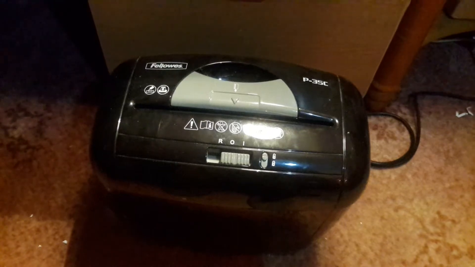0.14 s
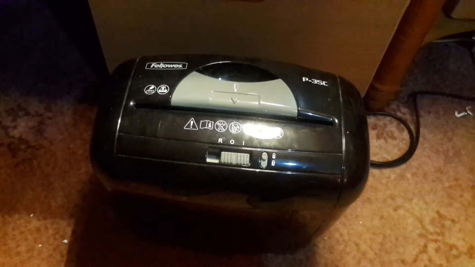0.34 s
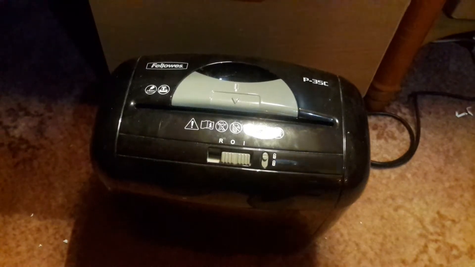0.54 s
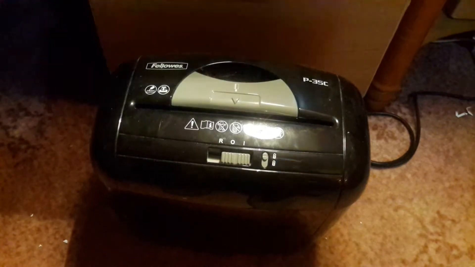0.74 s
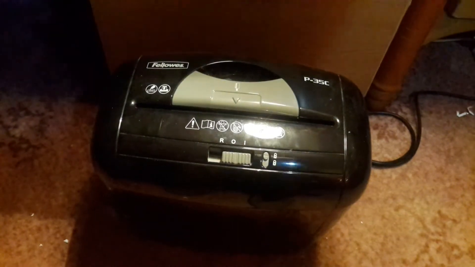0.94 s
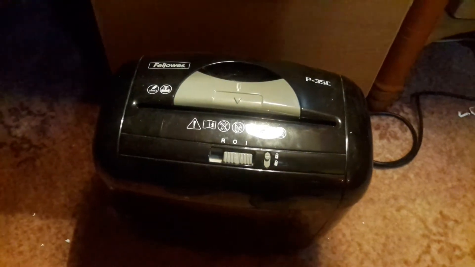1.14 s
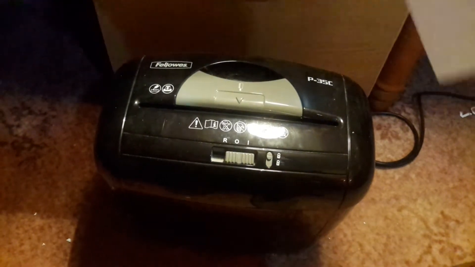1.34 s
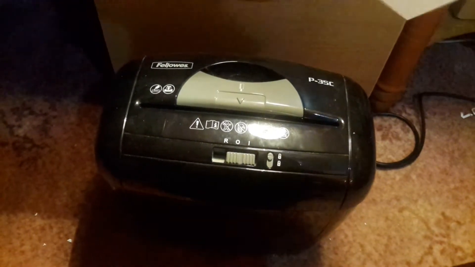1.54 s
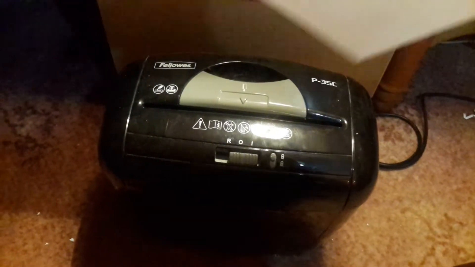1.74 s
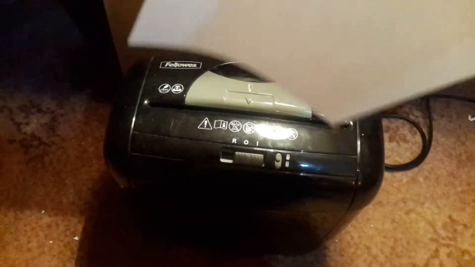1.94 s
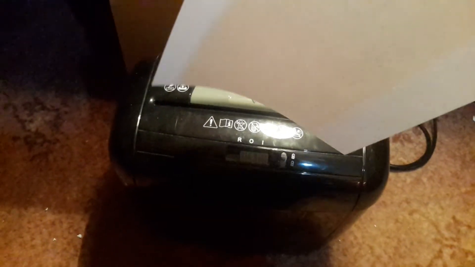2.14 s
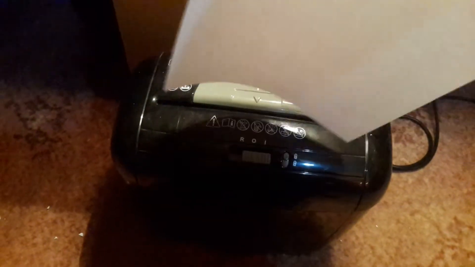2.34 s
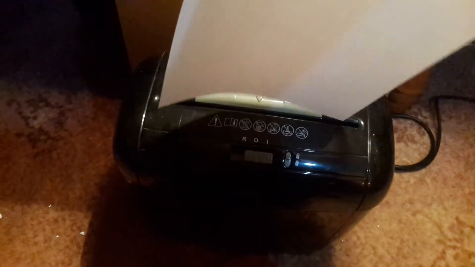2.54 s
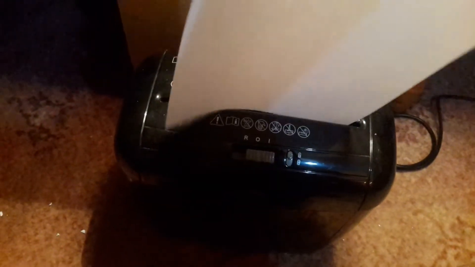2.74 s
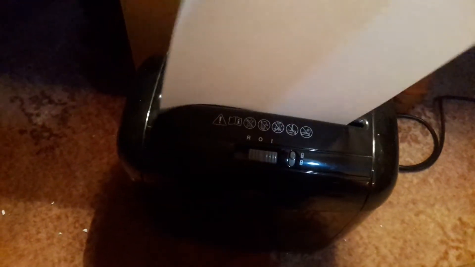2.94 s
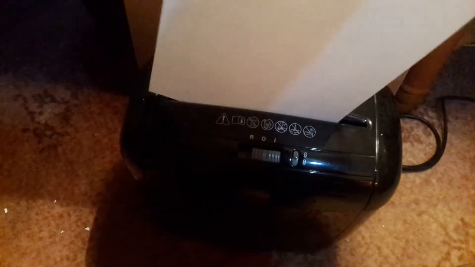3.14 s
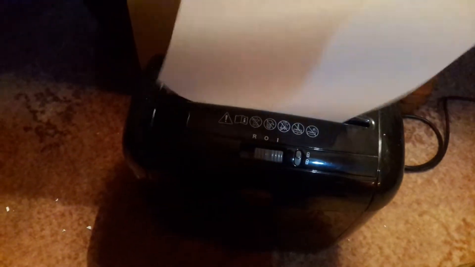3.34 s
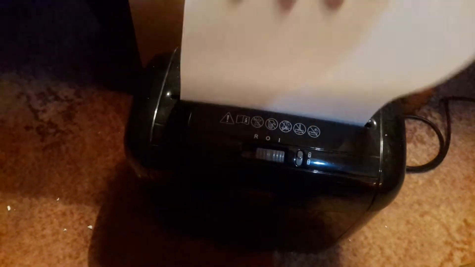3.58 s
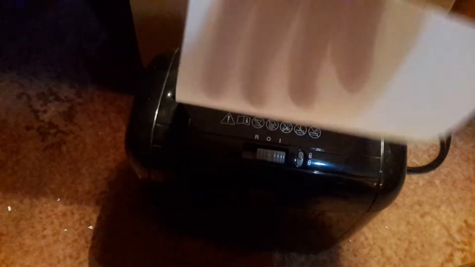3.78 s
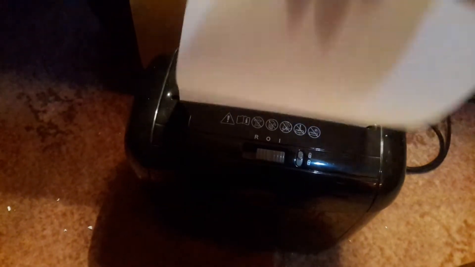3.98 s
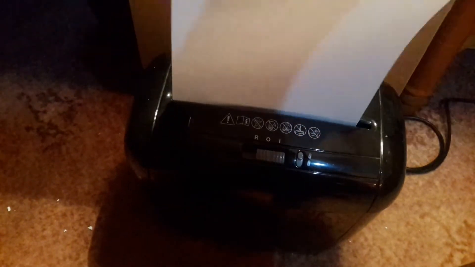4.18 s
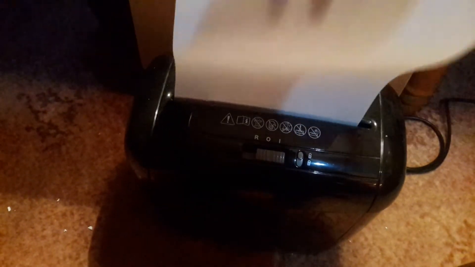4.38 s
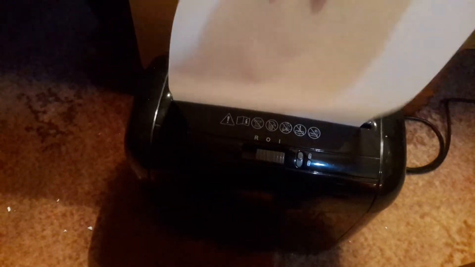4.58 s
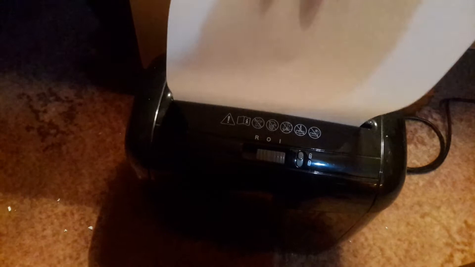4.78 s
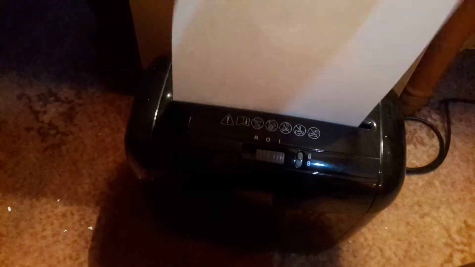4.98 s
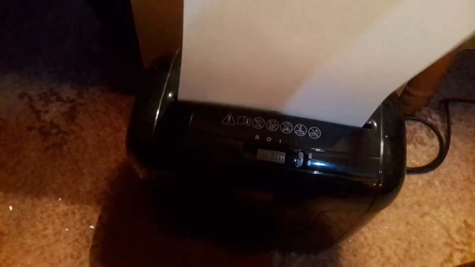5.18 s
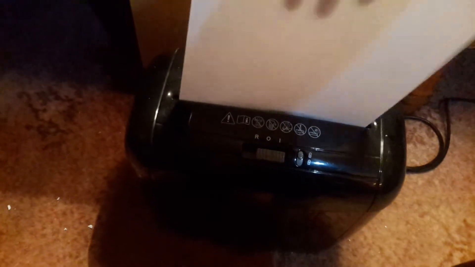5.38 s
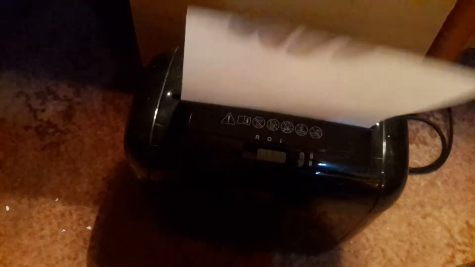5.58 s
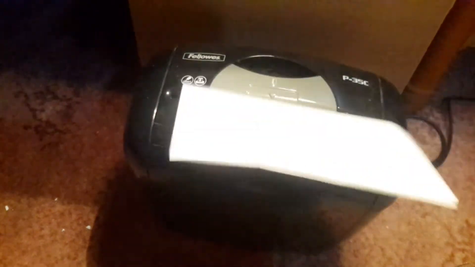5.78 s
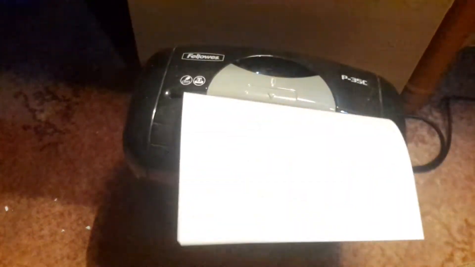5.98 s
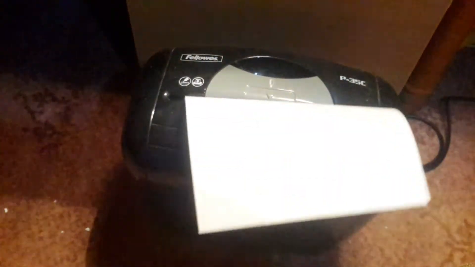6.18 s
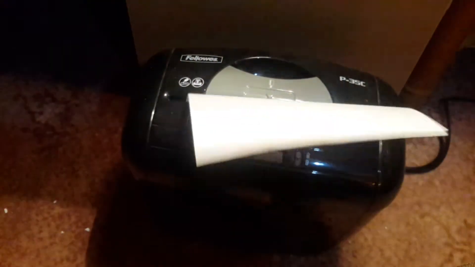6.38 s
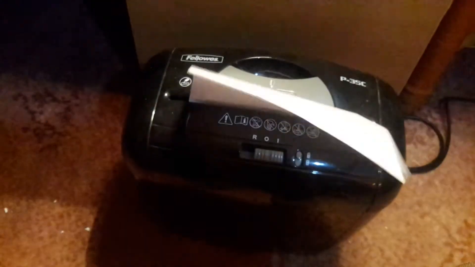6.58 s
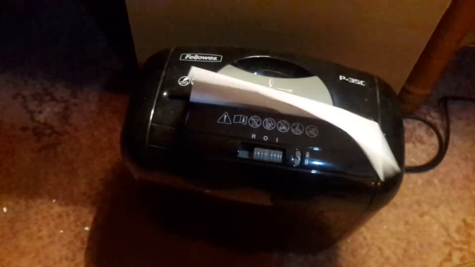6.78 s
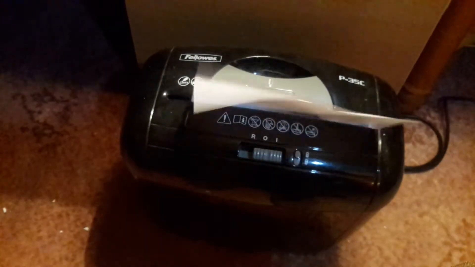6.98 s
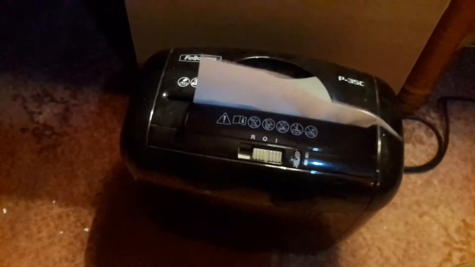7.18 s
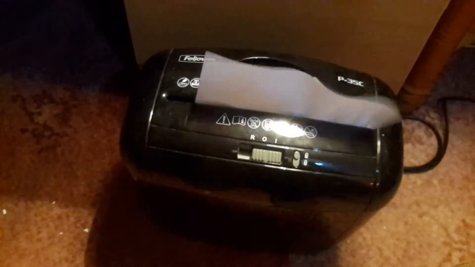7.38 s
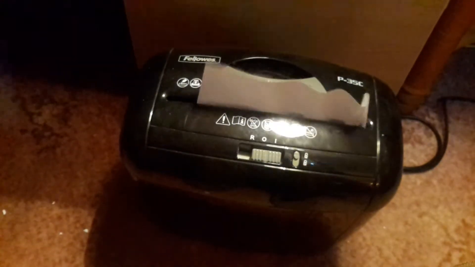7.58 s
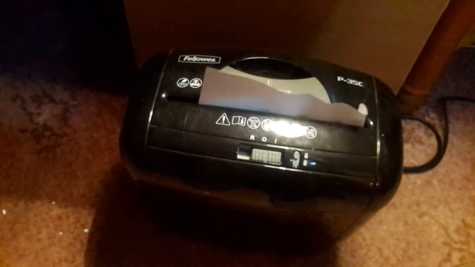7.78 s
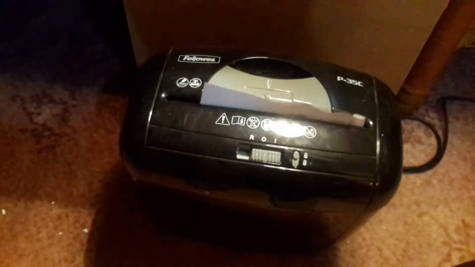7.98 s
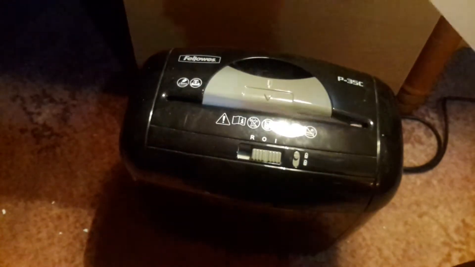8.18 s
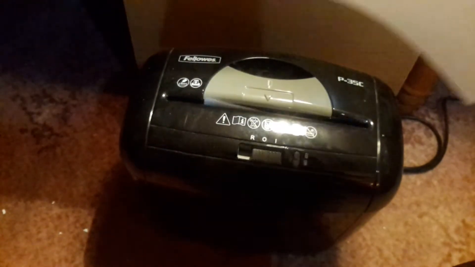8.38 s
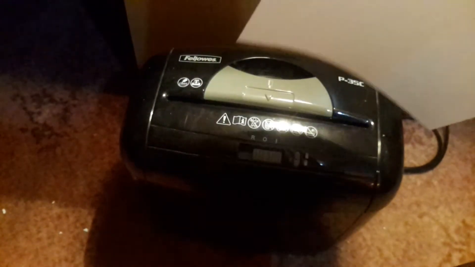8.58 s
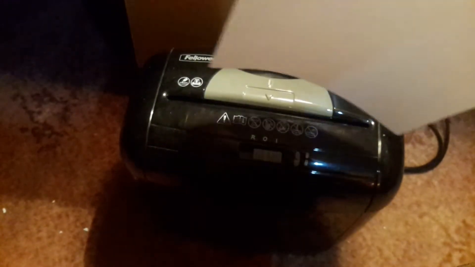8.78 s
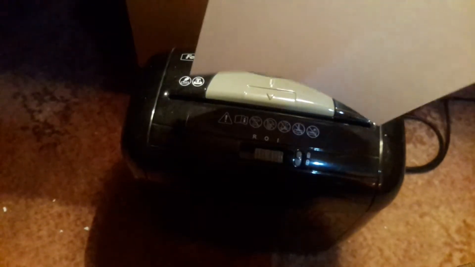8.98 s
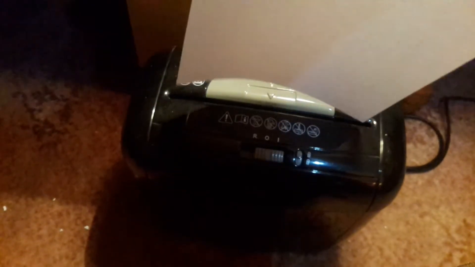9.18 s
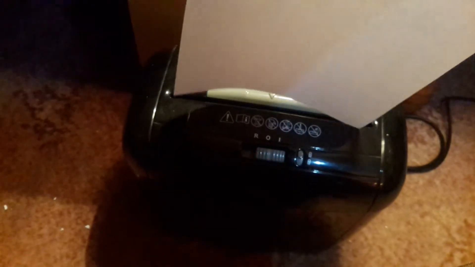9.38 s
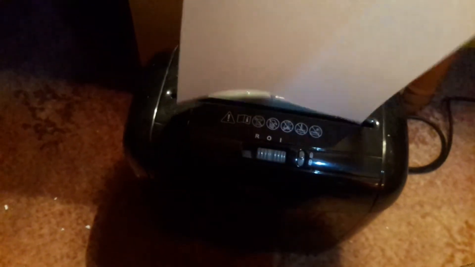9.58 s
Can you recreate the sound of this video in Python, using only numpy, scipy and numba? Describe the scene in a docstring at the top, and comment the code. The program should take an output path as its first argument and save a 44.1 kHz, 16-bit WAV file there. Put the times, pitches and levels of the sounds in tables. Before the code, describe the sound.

Close, dry paper handling and sharp creases, followed by a buzzy electric shredder grinding through the sheet, then running faster once it is gone.

```python
"""A small paper shredder chews a sheet close to a phone, in a carpeted room.
Paper: grain noise in five bands, swelling stroke by stroke, with noise bursts for cracks and slaps.
Motor: shaft harmonics and gear grains through housing modes; it twitches once, spins up, labours
while the cutters tear the sheet with denser grains, and runs up when it is gone.
The phone's look-ahead limiter ducks around the loudest cracks."""
import sys
import numpy as np
from scipy import signal
from scipy.fft import rfft, irfft
from scipy.io import wavfile
from scipy.ndimage import uniform_filter1d, minimum_filter1d
from numba import njit

SR = 44100
rng = np.random.default_rng(int(sys.argv[2]) if len(sys.argv) > 2 else 0)


def to_wav(s):
    """Save 16-bit WAV."""
    ch = np.atleast_2d(s).T  # columns
    pcm = np.round(np.clip(ch, -1, 1) * 32767)  # PCM
    wavfile.write(sys.argv[1], SR, pcm.astype(np.int16))


N = 424683
T = np.arange(N) / SR  # time in seconds

# Bands of the paper sound: thump, body, crinkle, swish, sheen. Each row: low and high edge in Hz.
PAPER_BANDS = [(50, 350), (350, 1500), (1500, 3000), (3000, 5500), (5500, 15500)]
# Low swing of the sheet. Each row: frequency in Hz, relative density in dB per Hz.
SHEET_SPECTRUM = [(29, -63), (55, -8), (90, -4.5), (213, 2.5), (341, -0.5), (399, 1), (758, 3.5),
                  (1010, -2), (1500, -8.5), (1950, -33), (3300, -120)]
# Treble of paper as the microphone port colours it.
# Each row: frequency in Hz, relative density in dB per Hz.
STRIP_SPECTRUM = [(820, -45.5), (1400, -14.5), (1580, -22.5), (1710, -17), (1890, -17), (2270, -10),
                  (2860, -13.5), (3300, -6.5), (4030, 9), (4830, -2.5), (5230, -7), (6200, -18),
                  (7070, -11.5), (8820, -14), (11800, -17), (12800, -23), (15500, -20.5)]
# Background hiss and hum. Each row: frequency in Hz, relative density in dB per Hz.
FLOOR_SPECTRUM = [(15, -41), (25, 14), (49, -10), (119, -3), (359, -15), (582, -6), (1530, -19),
                  (4260, -15), (15500, -64)]
FLOOR_DB = -67

# Strokes of the handled sheet. Each row: loudest moment in seconds, rise and fall in seconds per 20 dB,
# swish level in dB, body in dB relative to swish, crinkle in dB relative to swish.
STROKES = [(0.0, .05, 0.43, -67, -22, 1), (.28, 0.086, 0.31, -45.5, -13, -2.5),
           (.53, 0.045, 0.13, -67, 3, -3), (.68, 0.26, 0.11, -40.5, -2, 1.5),
           (.81, 0.1, 1, -37.5, -40, -11.5), (0.918, 0.083, 0.061, -41.5, 0, 11),
           (1.0, 0.013, 0.14, -43, -5, -15), (1.12, 0.24, 0.19, -39, -8.5, 5),
           (1.23, 0.24, 0.094, -38.5, -59, -16), (1.295, 0.047, 0.18, -30, -18.5, -1.5),
           (1.389, 0.15, 0.049, -58, 15, 19), (1.56, 0.077, 0.084, -42.5, -19, -3),
           (1.752, 0.43, 0.9, -56.5, -1.5, 1.5), (2.01, 0.091, 0.33, -44, -7, -0.5),
           (2.13, 0.11, 0.35, -48, 1, -19), (2.23, 0.089, 0.26, -31.5, -12, -0.5),
           (2.33, 0.041, 0.058, -11, 0, 1), (2.57, 0.09, 0.2, -35, -9, -7),
           (2.65, 0.26, 0.2, -35.5, -9, -0.5), (2.75, 0.12, 0.034, -30, -13, -7.5),
           (2.84, 0.3, 0.53, -43.5, -2, -6), (3.061, 0.11, 0.091, -33.5, -2, -1.5),
           (3.189, 0.017, 0.02, -23, -4, -12), (3.302, 0.86, 0.058, -40.5, -6.5, -6),
           (3.39, 0.088, 0.15, -40.5, -0.5, 2.5), (3.45, 0.074, 0.72, -39, -1, -2.5),
           (3.618, 0.12, 0.1, -39, 3.5, 7.5), (3.72, 0.15, 0.11, -43, -6, -10),
           (4.09, 0.091, 0.44, -40.5, -4, -1), (4.268, 0.32, 0.019, -54, 6, -21),
           (4.32, 0.067, 0.048, -53.5, 12, 7), (4.36, 0.064, 0.55, -47.5, -4, -0.5),
           (5.01, 0.037, 0.2, -44, -9, -7), (5.07, 0.077, 0.18, -45.5, 1, 3)]
# How the handled sheet is bent. Each row: time in seconds, pitch of the airy swish in Hz, pitch of the
# hollow ring in Hz, air in dB relative to the swish, hollow in dB relative to the body.
BENDS = [(0.2, 4400, 770, -50, 4), (0.28, 4440, 1190, -3, -5), (0.43, 4940, 916, -1, -3),
         (0.46, 4420, 595, -4, -29.5), (0.56, 4530, 610, -8.5, -12), (0.59, 4500, 890, -6, -7),
         (0.72, 5000, 840, 1.5, 4), (0.85, 4700, 1020, -8.5, -17), (1.15, 5020, 1230, -2.5, -14),
         (1.35, 4260, 1320, -10, -11), (1.62, 5040, 1430, -4, 0), (1.66, 4530, 800, -6, -19),
         (1.78, 4640, 700, -7, -8), (1.9, 4670, 810, -4, -14), (2.07, 4830, 680, -3, -3),
         (2.12, 4620, 900, 0, -4), (2.27, 4630, 1010, 0.5, 3.5), (2.35, 4600, 795, 2, -6),
         (2.5, 4870, 980, -0.5, 3.5), (2.58, 4900, 1030, 0, 1), (2.75, 5060, 950, -3.5, 1.5),
         (2.8, 4730, 895, -3.5, -6.5), (3.11, 4670, 664, -1.5, -11), (3.16, 4900, 970, -1, 4),
         (3.32, 4700, 613, -4.5, -16), (3.7, 4330, 614, -6, -21), (3.77, 4700, 880, -19, -4),
         (3.88, 4780, 770, -7, -10), (4.23, 4220, 1300, -4, -27), (4.31, 4500, 570, -12.5, -6),
         (4.79, 4550, 1010, -15, -16), (5.15, 4860, 600, -1, -8)]
# Rings of the sheet, held free and then standing in the slot.
# Each row: frequency in Hz, width in Hz, gain in dB.
FREE_RINGS = [(1190, 180, 1)]
SLOT_RINGS = [(583, 12, 1.4), (2270, 46, 0.95)]
# Buckling cracks. Each row: start in seconds, peak in dB before the lean, pitch in Hz that sets the lean,
# sheen in dB relative to the peak, decay to -60 dB in seconds (held to 0.003-0.06).
CRACKS = [(0.326, -44, 3940, -8, 0.012), (0.5124, -11.5, 3930, -7, 0.014), (0.9078, -21, 3760, -28, 0.014),
          (0.9848, -7, 3700, -24, 0.0053), (1.066, -25, 4290, -26, 0.021), (1.0999, -37, 2060, -21, 0.014),
          (1.277, -22, 3790, -7, 0.02), (1.6735, -50, 3300, -20, 0.005), (1.6906, -29.5, 2080, -19, 0.019),
          (1.813, -50, 4360, -1, 0.004), (1.906, -39, 3500, -13, 0.005), (1.949, -44.5, 2980, -15, 0.007),
          (1.8313, -36, 2090, -25, 0.0089), (1.9325, -37, 4200, -8, 0.004), (2.0004, -28, 2100, -13, 0.015),
          (2.206, -19, 4030, -9, 0.011), (2.23, -21, 3490, -24, 0.015), (2.2751, -5.5, 2190, -11, 0.014),
          (2.494, -26.5, 4230, -6, 0.0088), (2.562, -30, 4270, 3, 0.01), (2.649, -16, 4040, -18, 0.011),
          (2.7614, -28, 3950, -12, 0.014), (2.823, -23.5, 4200, -11, 0.0093),
          (2.908, -13, 4550, -6.5, 0.0037), (2.88, -32, 4000, -14, 0.008), (2.922, -29, 4000, -10, 0.008),
          (2.9392, -23, 4290, -10, 0.013), (2.9786, -18, 3600, -11, 0.009),
          (3.005, -18.5, 3970, -16, 0.027), (3.024, -16, 4000, -12, 0.014), (3.046, -17, 4440, -11, 0.018),
          (3.0636, -12, 4350, -20, 0.049), (3.1748, -11, 3900, -21, 0.072),
          (3.312, -2.5, 3070, -23, 0.0095), (3.441, -31, 4060, -20, 0.016), (3.5658, -33, 2540, 4, 0.014),
          (3.589, -17, 2340, -20, 0.0094), (3.6217, -19, 2280, -29, 0.014), (3.7686, -24, 2300, -19, 0.016),
          (3.919, -45, 4100, -1, 0.01), (4.005, -25, 3990, -14, 0.0081), (4.088, -28, 4100, -14, 0.01),
          (4.1704, -26.5, 4250, -17, 0.014), (4.179, -28, 4200, -6, 0.01), (4.2086, -19, 2260, -23, 0.018),
          (4.112, -43, 4700, -12, 0.04), (4.2582, -40, 3880, 5, 0.0056), (4.346, -25.5, 2350, 1, 0.0082),
          (4.42, -57, 4000, 2, 0.006), (4.487, -54, 4000, -5, 0.005), (4.515, -37.5, 3610, -19, 0.024),
          (4.524, -21.5, 2900, -19, 0.019), (4.72, -24, 1930, -27.5, 0.014), (5.0, -30, 4050, -9, 0.0059),
          (5.361, -5.5, 3500, -34, 0.013), (5.45, -11, 2130, -24, 0.014), (5.5056, -4, 2050, -13, 0.014),
          (5.5328, -6.5, 3780, -14, 0.036), (5.5713, 3, 2280, -6.5, 0.0033), (5.645, -10, 2320, -21, 0.032),
          (5.739, 11, 3700, -13, 0.039), (5.773, -2.5, 2290, -17, 0.012), (5.822, 0, 2410, -22, 0.011),
          (5.835, 4, 3340, -29, 0.0099), (5.861, -14, 3300, -10, 0.008), (5.88, -3, 2430, -18, 0.013),
          (5.915, -10, 3900, -5, 0.011), (5.9262, 0.5, 2360, -12, 0.0078), (6.0007, -5.5, 4030, -10, 0.029),
          (6.048, -10, 4000, -6, 0.012), (6.0883, -6, 2360, -18, 0.011), (6.124, 1, 2500, -27, 0.022),
          (6.14, -5, 3700, -24, 0.014), (6.155, -4.5, 2450, -26, 0.032), (6.257, -6.5, 2800, -26, 0.078),
          (6.305, -7, 2310, -19, 0.043), (6.317, -8, 3300, -14, 0.015), (6.3877, 1, 2750, -21, 0.025),
          (6.4477, -21, 2270, -22, 0.01), (6.5305, -15, 4080, -11, 0.011), (6.612, -2.5, 3300, -15, 0.012),
          (6.6887, -15, 2140, -16, 0.011), (6.766, -3, 2310, -14, 0.01), (6.7984, -11, 2370, -14, 0.01),
          (6.885, -7, 3800, -12, 0.0091), (6.903, -12, 2300, -17, 0.01), (6.9501, -16, 2260, -12, 0.01),
          (7.0918, -9, 2560, -14, 0.008), (7.1097, -7, 2560, -5, 0.012), (7.132, -5, 3500, -14, 0.012),
          (7.1835, -10, 3420, -12, 0.01), (6.4719, -3.5, 2640, -20, 0.018), (6.555, -10, 2390, -10, 0.012),
          (6.595, -8.5, 4090, -11, 0.043), (6.743, 4.5, 2920, -14, 0.026), (6.8306, -14, 2220, -19, 0.014),
          (6.8581, 3, 2490, -16, 0.0075), (7.0061, -2.5, 3240, -5.5, 0.01), (7.0306, -3.5, 4000, -3, 0.01),
          (7.04, -1.5, 4050, -8, 0.0088), (7.1588, -5, 3360, -8, 0.014), (7.2886, -5, 2330, -6, 0.011),
          (7.325, -14, 2240, 8.5, 0.0075), (7.3424, -6, 3370, -0.5, 0.013), (7.426, -7, 2300, 1.5, 0.012),
          (7.4906, -1, 1680, -7, 0.03), (7.533, -8, 3300, -19, 0.012), (7.553, -3, 2600, -8, 0.034),
          (7.5593, 4.5, 2590, -9, 0.023), (7.5697, -3, 3550, -8, 0.019), (7.582, -1, 2900, -14, 0.044),
          (7.6037, -5.5, 2160, -8, 0.033), (7.655, -4, 3560, -10, 0.017), (7.7445, -3.5, 3260, -7, 0.018),
          (7.778, -14.5, 2260, 7.5, 0.01), (7.828, -8, 2310, 0, 0.017), (7.877, -8.5, 2180, -5, 0.013),
          (7.9173, -7.5, 3030, -8, 0.012), (7.9365, -4, 4020, -1.5, 0.0097), (8.0038, -9.5, 3840, 2, 0.016),
          (8.0423, -8.5, 2480, -8.5, 0.029), (8.107, -21, 3900, 7, 0.0066), (8.1157, -15, 2750, -8, 0.014),
          (8.156, -18, 3800, -3, 0.011), (8.22, -15.5, 2310, 0, 0.013), (8.3, -28, 3900, 2, 0.008),
          (8.3724, -12, 3810, -6.5, 0.036), (8.4416, -7.5, 3820, -9, 0.014), (8.4734, -14, 2150, -5, 0.019),
          (8.5764, -12, 2190, -1.5, 0.01), (8.653, -7, 3730, -12, 0.0088),
          (8.6742, -9.5, 2150, -3.5, 0.025), (8.761, -10, 2160, -15, 0.016), (8.782, -11, 3900, -11, 0.01),
          (8.9424, -9.5, 4100, -28, 0.012), (9.095, -23, 4000, -15, 0.0088),
          (9.294, -16.5, 4000, -11, 0.011)]
# The sheet slaps the housing. Each row: start in seconds, body peak in dB, thump peak in dB (both before
# the lid knock), decay to -60 dB in seconds (held to 0.003-0.06).
SLAPS = [(0.51, -25.5, -19.5, 0.014), (1.0663, -33, -55, 0.017), (1.727, -46, -55, 0.022),
         (1.754, -52, -55, 0.012), (1.831, -45, -55, 0.01), (1.848, -43, -53, 0.011),
         (1.876, -49, -57, 0.02), (1.896, -49, -53, 0.01), (2.2736, -24, -17, 0.073),
         (2.298, -20, -26, 0.026), (2.303, -11.5, -13, 0.018), (2.356, -7.5, -10, 0.03),
         (2.324, -7, 9, 0.03), (2.3374, 0.5, -12, 0.028), (2.346, -17, -2, 0.026), (2.758, -41, -48, 0.054),
         (3.0655, -33, -29, 0.032), (3.1757, -28, -36, 0.077), (3.3141, -19, -27, 0.0049),
         (3.44, -36, -55, 0.04), (4.169, -34, -37, 0.022), (4.2063, -21.5, -25, 0.055),
         (4.346, -34, -49, 0.017), (4.7182, -27.5, -37, 0.027), (4.53, -32.5, -50, 0.027),
         (7.4903, -9.5, -12.5, 0.039), (7.522, -13, -14, 0.011)]
# Pushes of air from the swinging sheet on the microphone.
# Each row: centre in seconds, strength in dB, pitch in Hz.
PUFFS = [(2.17, -47, 105), (2.279, -17.5, 115), (2.308, -30, 95), (2.335, -33, 84.5), (2.378, -39, 60),
         (2.761, -29.5, 101), (3.18, -39, 80), (3.316, -42, 80), (4.213, -35, 101), (7.495, -26, 90)]

# The switch. Each row: shaft starts, gears engage, switched off, spin-up time constant, all in seconds.
RUNS = [(4.47, 4.518, 4.69, .145), (5.155, 5.178, 10, .1)]
# Speed that the load allows. Each row: time in seconds, full speed in shaft turns per second.
LOAD_SPEED = [(5.3, 238), (5.55, 228), (5.7, 213), (6.0, 215), (6.36, 222), (6.6, 218.5), (6.84, 220.5),
              (7.02, 211), (7.32, 220), (7.56, 216), (7.7, 219), (8.1, 219), (8.4, 215), (8.9, 211.5),
              (9.0, 219), (9.15, 238), (9.3, 250), (9.48, 264.5), (9.63, 267)]
# Motor level. Each row: time in seconds, gain in dB at the loaded speed and above.
MOTOR_LEVEL = [(4.53, -26.5), (4.6, -24.5), (4.68, -22), (5.19, -23), (5.25, -22.5), (5.3, -22.5),
               (5.45, -21.5), (5.8, -22.5), (6.43, -26), (6.96, -21.5), (7.45, -20.5), (7.6, -27),
               (7.72, -25), (8.28, -25), (8.41, -22.5), (9.01, -21.5), (9.17, -22), (9.63, -23)]
# Lines of the whine. Each row: multiple of shaft rate, relative level in dB at the loaded speed,
# rise in dB per octave above that speed, rise in dB per octave below it (down to 1.1 octaves).
WHINE_LINES = [(.75, -14, 18, -20), (0.999, -6, 29, -8), (1.491, -4, -18, -22), (2.01, -5.5, 27, 1),
               (3, -11.5, -2, -3), (4, -3, 34, -8), (4.25, -2, -42, -33), (4.995, -11, 15, -14),
               (7.98, 1, 12, 7), (9.94, 1, -13, -19), (11.96, 4, 16, -14), (14.3, -8, 16, -10),
               (20.2, -10, 14, 18), (23.3, -12, 0, 14), (30.8, -19, 10, 22), (35.5, -26, 5, -10),
               (40.3, -25, 12, -10), (44.5, -31, 5, -10)]
# Modes of the plastic housing. Each row: frequency in Hz, basic width in Hz (broader for the whine),
# gain in dB (upper modes also change with speed).
HOUSING_MODES = [(183, 30, -15.5), (201, 115, -6.5), (316, 42, -1.5), (497, 19, -12), (642, 120, 2),
                 (811, 51, -3), (950, 49, 4), (1058, 35, -7.5), (1690, 30, -6), (2025, 7.9, 7),
                 (2062, 17, 2.5), (2850, 68, -21), (3780, 120, -27), (4220, 110, -31), (5060, 150, -54),
                 (6900, 310, -16), (8500, 270, -9), (9700, 250, -9), (10340, 540, -9), (11800, 1600, -7)]
# Housing modes that light up as whine lines sweep through them below speed.
# Each row: frequency in Hz, width in Hz of each of two passes, gain in dB.
SWEPT_MODES = [(320, 90, 14), (620, 120, 4), (800, 190, 19), (1450, 110, 14), (2250, 300, 2),
               (3800, 450, 19)]

# Level of the cutters. Each row: time in seconds, crinkle in dB at the loaded speed and above,
# sheen in dB relative to crinkle.
CUTTING = [(5.3, -27, -40), (5.47, -25, -36), (5.6, -21.5, -17.5), (5.89, -20.5, -17), (6.31, -26.5, -22.5),
           (6.52, -25, -17), (6.72, -21, -15), (7.23, -19.5, -15), (7.63, -24, -11), (7.82, -24.5, -15.5),
           (8.16, -29.5, -13.5), (8.39, -30, -17), (8.64, -24.5, -22), (8.8, -25.5, -30), (9.2, -25.5, -46),
           (9.63, -24, -46)]
# Rings of the steel discs. Each row: frequency in Hz, width in Hz (narrowed to 0.77 of it),
# prominence in dB (a quarter of its distance below the strongest is heard).
DISC_RINGS = [(7080, 170, -6), (8540, 150, -4), (9500, 290, 4), (10300, 280, -6), (11450, 270, 0)]
# Rings of the sheet standing in the slot while it is cut, less as it shortens.
# Each row: frequency in Hz, width in Hz, gain in dB at full length.
FED_RINGS = [(2300, 130, 0.5), (4020, 76, 1.3)]

# handling: flap is set by body, sheen by swish (dB at body -45 dB or swish -40 dB, then dB per dB)
STROKE_FADE_DB, IN_SLOT_S = 20, 3
FLAP_DB, FLAP_FOLLOWS, SHEEN_DB, SHEEN_FOLLOWS = -52, 0.99, -50, 1
AIR_WIDTH_HZ, HOLLOW_WIDTH_HZ = 1570, 316
LARGEST_SLIP = 2.2  # in units of the mean scatter
# cracks: lean in dB per octave off a band's pitch; body and thump relative to the peak
CRACK_LEAN_DB, CRACK_BODY_DB, CRACK_THUMP_DB = 8, -20, -38.5
CRINKLE_HZ, SWISH_HZ = 2300, 4000
# lesser cracks while the sheet is drawn in: strongest level, scatter below it, weaker as the sheet runs out
FEED_START_S, FEED_END_S, FEED_CRACKS = 5.35, 8.8, 260
FEED_CRACK_DB, FEED_SCATTER_DB, FEED_SHEEN_DB, FEED_T60_S = -12, 15, -11.5, 0.0093
FEED_FADE_S, FEED_FADE_DB_PER_S = 7.75, 6
SLAP_CRINKLE_DB = -6  # relative to the body
LID_HZ, LID_WIDTH_HZ, LID_DB = 1500, 700, 11
PUFF_CYCLES = 0.62
# motor speed
LOADED_HZ = 217
COAST_S, STOP_S = .175, .21
JITTER, SLOW_JITTER = .004, .016  # share of speed; extra per octave below the loaded speed
# whine: relative to the rattle, loss per octave below speed while powered, loss when coasting
WHINE_DB, POWERED_SLOW_LOSS_DB, COASTING_DB = -3.5, 3, -10
LOADED_FLUTTER_DB, FREE_FLUTTER_DB = 4.5, 3.5  # scale of the random walk on each line
LINE_BLUR_HZ, SLOW_BLUR = .8, 1  # width per multiple; share more per octave below speed
DIRECT_SHARE, SLOW_DIRECT_DB = .25, 18  # whine heard past the housing; its loss per octave below speed
PORT_HZ, PORT_WIDTH_HZ, PORT_DB = 3850, 500, 3  # microphone port
# rattle: loss per octave below speed; gain of modes over 1500 Hz and its change per octave above speed;
# modes over 5000 Hz win part of that change back
RATTLE_SPEED_DB, UPPER_DB, UPPER_FREE_DB, TOP_FREE_DB = 6, -9.5, -34, 17
# cutters: swish relative to crinkle plus a share of the sheen; loss per octave below speed
CUT_SWISH_DB, CUT_SWISH_FOLLOWS, CUT_SPEED_DB = 1, 0.14, 19
FEED_GRAIN_SCATTER_DB, SPENT_SCATTER_DB = 6.5, 0.5  # until the feed ends, and after
BETWEEN_RINGS_DB, FED_RING_END_S = -4, 7.7
ROOM_T60_S, ROOM_DB = 0.043, -16
LIMIT_DB, LOOK_S, RELEASE_S, TOP_HZ = -10.5, 0.029, 0.0061, 15700


def undb(db):
    """Amplitude factor for a level in dB."""
    return 10 ** (np.asarray(db) / 20)


def level(x, db):
    """Sets the RMS level of x."""
    return x * undb(db) / np.sqrt(np.mean(x ** 2))


def column(table, k):
    """Column k of a timed table, drawn as straight lines over time."""
    rows = np.array(table)
    return np.interp(T, rows[:, 0], rows[:, k])


def colour(x, points):
    """Causal filter from (Hz, dB) points, by way of the cepstrum; the curve bottoms out at -60 dB."""
    hz, db = np.transpose(points)
    size = 2048
    grid = np.maximum(np.arange(size // 2 + 1) * SR / size, 1)
    curve_db = np.interp(np.log(grid), np.log(hz), np.maximum(db, -60))
    cepstrum = irfft(curve_db * np.log(10) / 20)
    # fold onto positive time: minimum phase
    cepstrum[1:size // 2] *= 2
    cepstrum[size // 2 + 1:] = 0
    response = irfft(np.exp(rfft(cepstrum))).reshape((1,) * (x.ndim - 1) + (size,))
    return signal.fftconvolve(x, response, axes=-1)[..., :x.shape[-1]]


def band(x, edges_hz):
    """Band-pass between two edges."""
    return signal.sosfilt(signal.butter(3, edges_hz, "bandpass", fs=SR, output="sos"), x)


def mode(x, hz, width_hz):
    """One resonance, gain 1 at its centre."""
    return signal.lfilter(*signal.iirpeak(hz, hz / width_hz, fs=SR), x)


def ring_bank(x, rings):
    """Sum of resonances from (Hz, width Hz, dB) rows."""
    return sum(undb(db) * mode(x, hz, width_hz) for hz, width_hz, db in rings)


@njit
def moving_mode(x, hz, width_hz, sr):
    """State-variable band-pass whose centre moves, gain 1 at the centre."""
    y, band_state, low_state = np.empty(len(x)), 0., 0.
    for i in range(len(x)):
        g, k = np.tan(np.pi * hz[i] / sr), width_hz / hz[i]
        v = (band_state + g * (x[i] - low_state)) / (1 + g * (g + k))
        band_state = 2 * v - band_state
        low_state += 2 * g * v
        y[i] = k * v
    return y


def walk(rate):
    """Random levels held 1 / rate s and slewed; spread near 0.8."""
    k = int(SR / rate)
    held = np.repeat(rng.standard_normal(N // k + 1), k)
    return 1.035 * uniform_filter1d(uniform_filter1d(held, k), k)[:N]


def grains(rate, scatter_db, tail_s, smooth):
    """Noise that jumps at each slip and dies away to a smooth share; most slips are small."""
    scatter = np.minimum(rng.exponential(size=N), LARGEST_SLIP)
    size = (rng.random(N) < rate / SR) * undb(scatter_db * scatter)
    power = signal.lfilter([1], [1, -np.exp(-1 / (tail_s * SR))], size ** 2)
    power /= uniform_filter1d(power, SR // 4) + 1e-12
    return rng.standard_normal(N) * np.sqrt(smooth + power)


def paper(x):
    """Splits an excitation into the five bands of the sheet's sound."""
    low, high = colour(x, SHEET_SPECTRUM), colour(x, STRIP_SPECTRUM)
    return [band(low if edges[1] <= 1500 else high, edges) for edges in PAPER_BANDS]


def floor():
    """Steady background noise, coloured and set to its level."""
    return level(colour(rng.standard_normal(N), FLOOR_SPECTRUM), FLOOR_DB)


def rustle():
    """Paper sliding over fingers and plastic, stroke by stroke; each band also flickers alone."""
    power = np.zeros((5, N))
    for s, rise, fall, db, body_db, crinkle_db in STROKES:
        near = slice(max(int((s - 3 * rise) * SR), 0), int((s + 3 * fall) * SR))
        fade_db = -STROKE_FADE_DB * np.maximum((s - T[near]) / rise, (T[near] - s) / fall)
        swish = db + fade_db
        body = swish + body_db
        flap = FLAP_DB + FLAP_FOLLOWS * (body + 45)
        sheen = SHEEN_DB + SHEEN_FOLLOWS * (swish + 40)
        power[:, near] += undb([flap, body, swish + crinkle_db, swish, sheen]) ** 2
    slips = grains(rate=360.0, scatter_db=4.0, tail_s=0.0053, smooth=0.21)
    dry = sum(level(part, 0) * np.sqrt(p) * undb(2.16 * walk(40))
              for part, p in zip(paper(slips), power))
    # bending moves an airy ring that follows the swish (3) and a hollow one that follows the body (1)
    for k, part, width_hz in ((1, 3, AIR_WIDTH_HZ), (2, 1, HOLLOW_WIDTH_HZ)):
        hz = column(BENDS, k)
        once = moving_mode(slips, hz, float(width_hz), float(SR))
        ring = moving_mode(once, hz, float(width_hz), float(SR))
        ring_db = column(BENDS, k + 2) + 2.0 * walk(30.28)
        dry = dry + level(ring, 0) * np.sqrt(power[part]) * undb(ring_db)
    return dry + np.where(T < IN_SLOT_S, ring_bank(dry, FREE_RINGS), ring_bank(dry, SLOT_RINGS))


def snaps(s, peaks_db, t60):
    """A tick, then a short burst of noise; every band of the sheet has its own peak."""
    t = np.arange(SR // 16) / SR
    at = (s[:, None] * SR).astype(int) + np.arange(len(t))
    decay = np.exp(-np.log(1000) * t / np.clip(t60[:, None], .003, .06))
    burst = rng.standard_normal((len(s), len(t))) * decay
    burst[:, 0] += 2.5
    out = np.zeros(N + len(t))
    for snap, peak_db in zip(paper(burst), peaks_db):
        peak = np.abs(signal.hilbert(snap)).max(axis=1)
        np.add.at(out, at, snap * (undb(peak_db) / peak)[:, None])
    return out[:N]


def cracks():
    """Creases snap, leaning to crinkle or swish by pitch; many lesser ones come at random in the feed."""
    u = rng.random((FEED_CRACKS, 4)).T
    feed_s = FEED_START_S + (FEED_END_S - FEED_START_S) * u[0]
    running_out_db = FEED_FADE_DB_PER_S * np.maximum(feed_s - FEED_FADE_S, 0)
    lesser = [feed_s,
              FEED_CRACK_DB - FEED_SCATTER_DB * u[1] - running_out_db,
              CRINKLE_HZ * (SWISH_HZ / CRINKLE_HZ) ** u[2],
              FEED_SHEEN_DB + 4.4 * (u[3] - .5),
              np.full(FEED_CRACKS, FEED_T60_S)]
    s, db, hz, sheen_db, t60 = np.hstack([np.transpose(CRACKS), lesser])
    crinkle = db - CRACK_LEAN_DB * np.maximum(np.log2(hz / CRINKLE_HZ), 0)
    swish = db - CRACK_LEAN_DB * np.maximum(np.log2(SWISH_HZ / hz), 0)
    return snaps(s, [db + CRACK_THUMP_DB, db + CRACK_BODY_DB, crinkle, swish, db + sheen_db], t60)


def slaps():
    """Dull blows of the whole sheet, with little treble; the housing lid knocks along."""
    s, body_db, thump_db, t60 = np.transpose(SLAPS)
    blows = snaps(s, [thump_db, body_db, body_db + SLAP_CRINKLE_DB], t60)
    return blows + undb(LID_DB) * mode(blows, LID_HZ, LID_WIDTH_HZ)


def room(x):
    """Short dull tail of a carpeted corner."""
    t = np.arange(SR // 4) / SR
    decay = np.exp(-np.log(1000) * t / ROOM_T60_S) * (t > .003)
    tail = band(rng.standard_normal(len(t)), (100, 6000)) * decay
    return x + undb(ROOM_DB) * signal.fftconvolve(x, tail / np.sqrt(np.sum(tail ** 2)))[:N]


def puffs():
    """Each push of air is one soft swing of pressure."""
    return sum(undb(db) * np.sin(2 * np.pi * hz * (T - s)) * np.exp(-((T - s) * hz / PUFF_CYCLES) ** 2)
               for s, db, hz in PUFFS)


def spin():
    """Shaft speed (Hz) that climbs while switched on and coasts after, and whether gears turn (0-1)."""
    share, gate = np.full(N, .2), np.zeros(N)  # the share never falls below 0.2
    for on, engage, off, tau in RUNS:
        up = 1 - np.exp(-np.clip(np.minimum(T, off) - on, 0, None) / tau)
        coast = np.exp(-np.clip(T - off, 0, None) / COAST_S)
        share = np.maximum(share, up * coast)
        gate += np.clip((T - engage) / 0.012, 0, 1) * np.clip((off + STOP_S - T) / 0.054, 0, 1)
    return share * column(LOAD_SPEED, 1), gate


def powered():
    """True except for a while after each switch-off, as the motor coasts."""
    return ~np.any([(T > off) & (T < off + 2 * STOP_S) for _, _, off, _ in RUNS], axis=0)


def wander(width_hz):
    """Phase that drifts smoothly at random and widens a line to width_hz."""
    step = 64
    steps = rng.standard_normal(len(T[::step])) * np.sqrt(2 * np.pi * width_hz[::step] * step / SR)
    return np.interp(T, T[::step], np.cumsum(steps))


def motor_whine(turn, octaves):
    """Shaft harmonics, blurred and fluttering, heard past and through the plastic housing."""
    slow = np.minimum(octaves, 0)
    flutter_db = np.interp(octaves, (0, .15), (LOADED_FLUTTER_DB, FREE_FLUTTER_DB))
    blur_hz = LINE_BLUR_HZ * (1 - SLOW_BLUR * slow)
    lines = np.zeros(N)
    for k, db, above_db, below_db in WHINE_LINES:
        speed_db = np.where(octaves > 0, above_db, -below_db) * np.maximum(octaves, -1.1)
        phase = 2 * np.pi * (k * turn + rng.random()) + wander(k * blur_hz)
        lines += undb(db + speed_db + flutter_db * walk(45)) * np.sin(phase)
    swept = sum(undb(db) * mode(mode(lines, hz, w), hz, w) for hz, w, db in SWEPT_MODES)
    swept = np.clip(-3.0 * slow, 0, 1) * swept  # full a third of an octave below speed
    direct = DIRECT_SHARE * (undb(SLOW_DIRECT_DB * slow) * lines + swept)
    port = undb(PORT_DB) * mode(lines, PORT_HZ, PORT_WIDTH_HZ)
    housed = sum(undb(db) * mode(lines, hz, 2.17 * w) for hz, w, db in HOUSING_MODES)
    whine = direct + port + housed
    whine_db = WHINE_DB + np.where(powered(), POWERED_SLOW_LOSS_DB * slow, COASTING_DB)
    return undb(whine_db) * whine / whine[T > FEED_START_S].std()


def gear_rattle(turn, octaves):
    """Gears knock in grains that swell four times a turn and ring the housing modes."""
    swell = 1 + 0.2 * np.cos(2 * np.pi * 4 * turn)
    knock = grains(rate=830.0, scatter_db=2.0, tail_s=0.00078, smooth=0.28) * swell
    knock = band(knock, (110, 11800))
    fast = np.maximum(octaves, 0)
    upper_db = UPPER_DB + UPPER_FREE_DB * fast
    # slow gears knock softly, which leaves the higher modes quiet
    soft_db = 8.2 * np.minimum(octaves, 0)
    rattle = np.zeros(N)
    for hz, width_hz, db in HOUSING_MODES:
        mode_db = db + 1.2 * walk(12) + soft_db * max(np.log2(hz / 400), 0)
        if hz > 1500:
            mode_db = mode_db + upper_db
        excitation = knock
        if hz > 5000:
            mode_db = mode_db + TOP_FREE_DB * fast
            excitation = mode(knock, hz, 2 * width_hz)
        rattle += undb(mode_db) * level(mode(excitation, hz, width_hz), -13.0)
    return rattle


def motor():
    """Whine and rattle both follow one unsteady shaft speed and sound while the gears turn."""
    shaft_hz, gate = spin()
    jitter = JITTER + SLOW_JITTER * np.maximum(np.log2(LOADED_HZ / shaft_hz), 0)
    shaft_hz = shaft_hz * (1 + jitter * walk(60))
    turn = np.cumsum(shaft_hz) / SR
    octaves = np.log2(shaft_hz / LOADED_HZ)  # from the loaded speed
    motor_db = column(MOTOR_LEVEL, 1) + RATTLE_SPEED_DB * np.minimum(octaves, 0)
    return gate * undb(motor_db) * (gear_rattle(turn, octaves) + motor_whine(turn, octaves))


def cutters():
    """Dense tearing grains between steel discs, which ring; the standing sheet rings less as it shortens."""
    shaft_hz, gate = spin()
    crinkle_db = column(CUTTING, 1) + CUT_SPEED_DB * np.minimum(np.log2(shaft_hz / LOADED_HZ), 0)
    sheen_db = column(CUTTING, 2)
    swish_db = crinkle_db + CUT_SWISH_DB + CUT_SWISH_FOLLOWS * sheen_db
    scatter_db = np.where(T < FEED_END_S, FEED_GRAIN_SCATTER_DB, SPENT_SCATTER_DB)
    tearing = grains(rate=420.0, scatter_db=scatter_db, tail_s=0.0017, smooth=0.6)
    crinkle, swish, sheen = paper(tearing)[2:]
    top_db = max(db for _, _, db in DISC_RINGS)
    discs = sum(undb((db - top_db) / 4) * mode(sheen, hz, 0.77 * w) for hz, w, db in DISC_RINGS)
    sheen = undb(BETWEEN_RINGS_DB) * sheen + discs
    bands = ((crinkle, crinkle_db), (swish, swish_db), (sheen, crinkle_db + sheen_db))
    dry = gate * sum(level(part, 0) * undb(db + 1.4 * walk(25)) for part, db in bands)
    standing = np.clip((FED_RING_END_S - T) / (FED_RING_END_S - FEED_START_S), 0, 1)
    return dry + standing * ring_bank(dry, FED_RINGS)


def scene():
    """Mixes all layers to one channel; cracks and slaps also sound in the room."""
    handling = rustle() + room(cracks() + slaps()) + puffs()
    return (floor() + handling + motor() + cutters())[None]


def record(dry):
    """A limiter that sees peaks coming fades down ahead and recovers after; then the top is cut."""
    look = int(LOOK_S * SR)
    loudness = uniform_filter1d(np.abs(dry[0]), 64)
    need = np.minimum(1, undb(LIMIT_DB) / (loudness + 1e-9))
    ahead = minimum_filter1d(need, look, origin=-(look // 2))
    gain = uniform_filter1d(ahead, look, origin=(look - 1) // 2)
    keep = np.exp(-1 / (RELEASE_S * SR))
    recovering = 1 - signal.lfilter([1 - keep], [1, -keep], 1 - gain)
    gain = np.minimum(gain, recovering)
    low_pass = signal.ellip(10, .2, 70, TOP_HZ, fs=SR, output="sos")
    return signal.sosfilt(low_pass, dry * gain)


dry = scene()
out = record(dry)
to_wav(out)
```